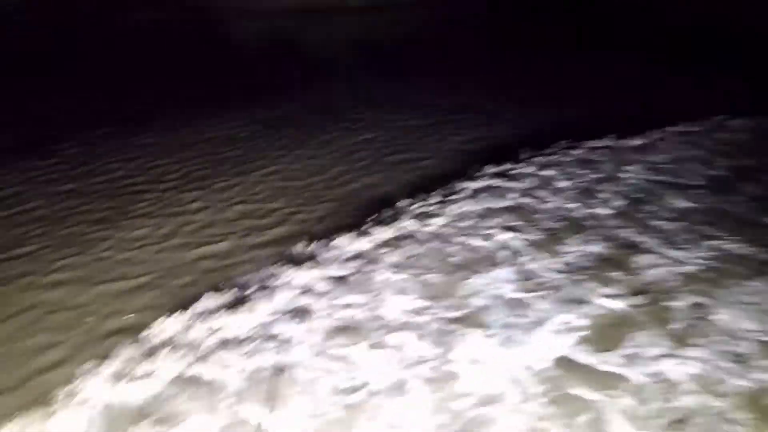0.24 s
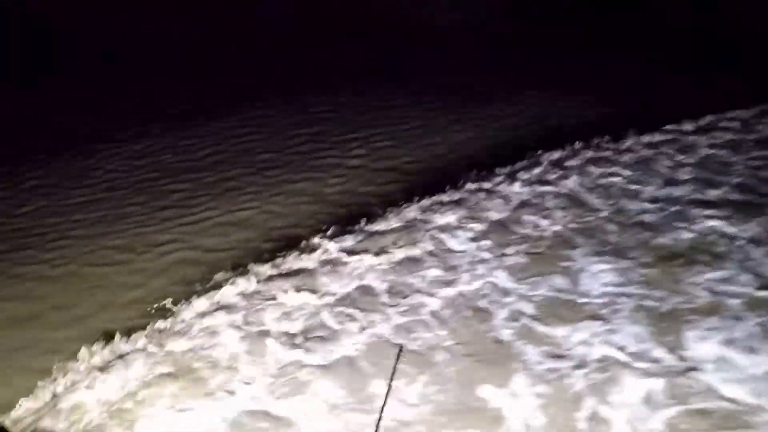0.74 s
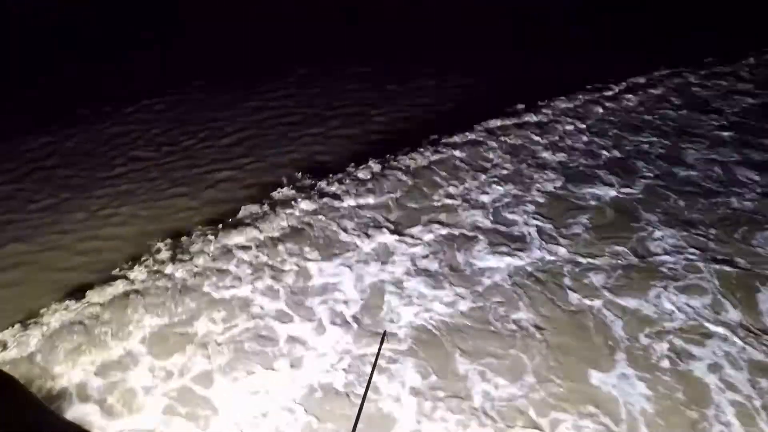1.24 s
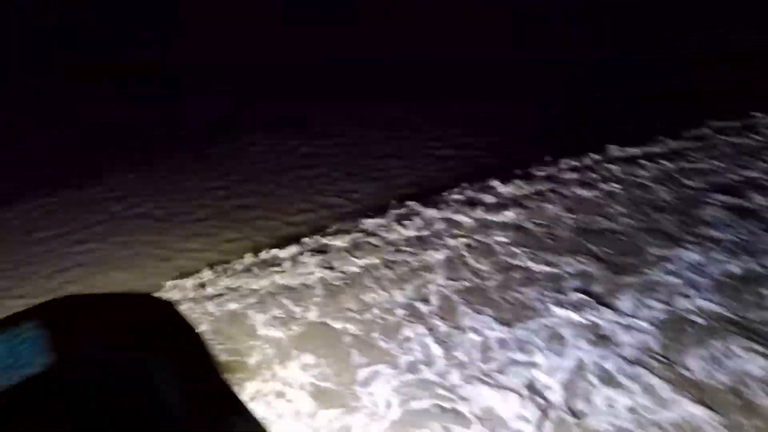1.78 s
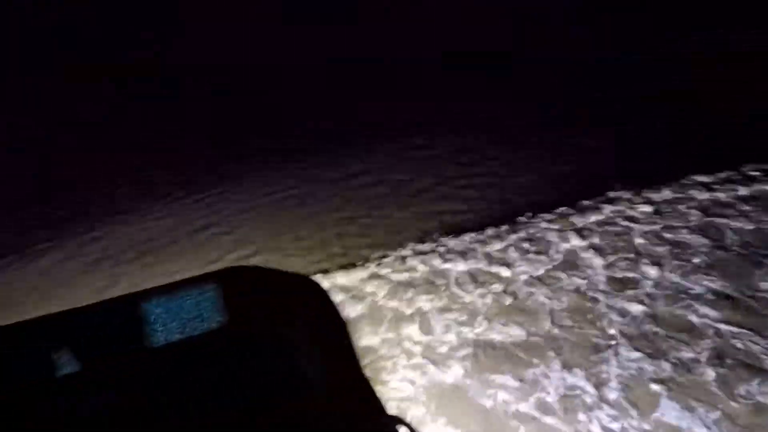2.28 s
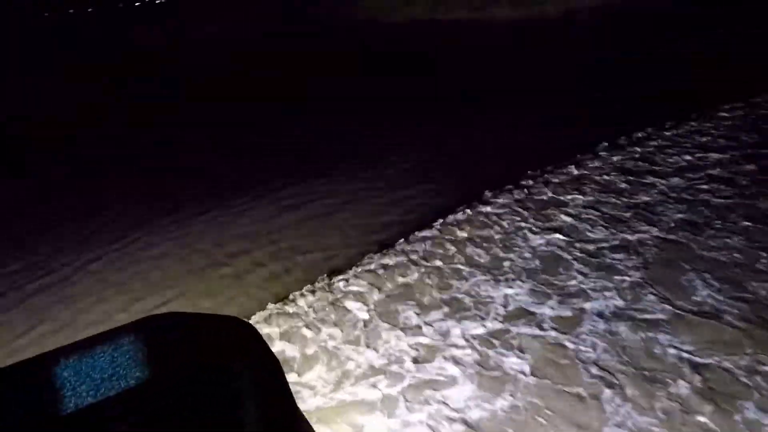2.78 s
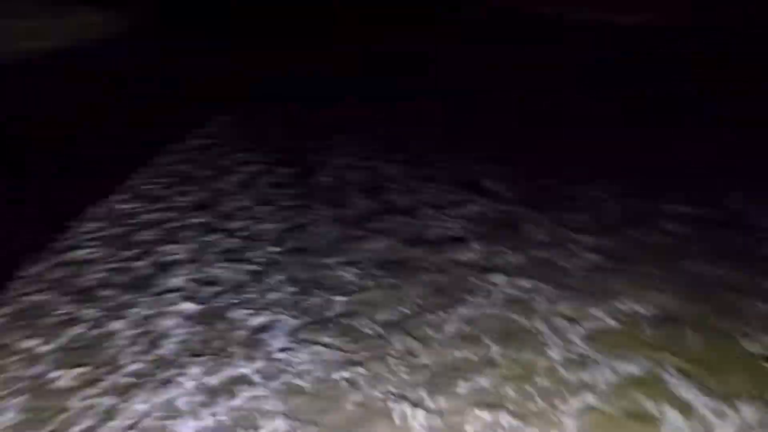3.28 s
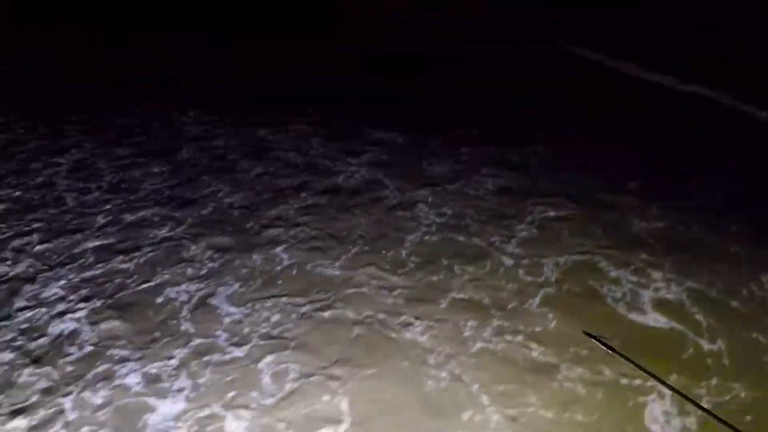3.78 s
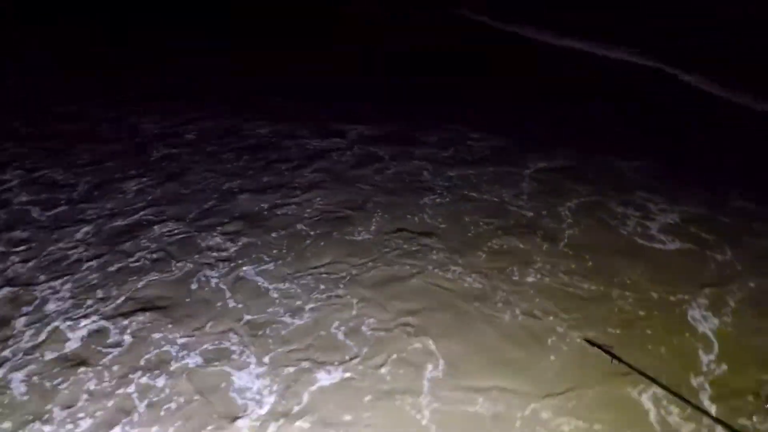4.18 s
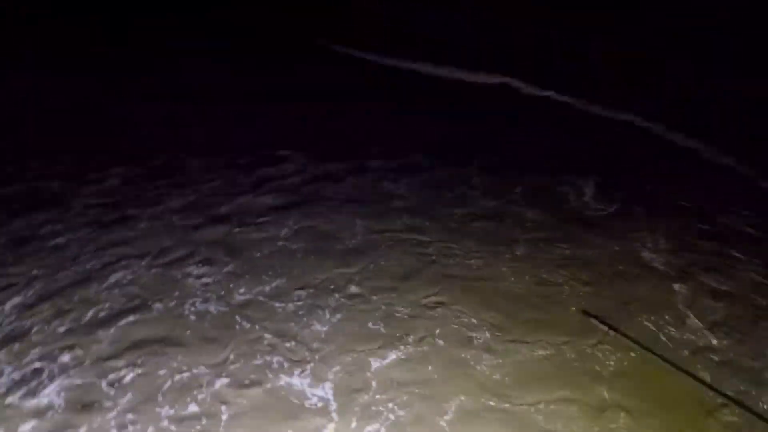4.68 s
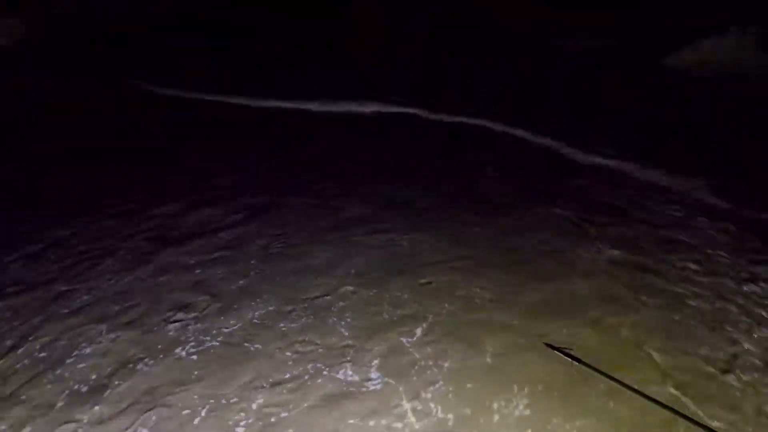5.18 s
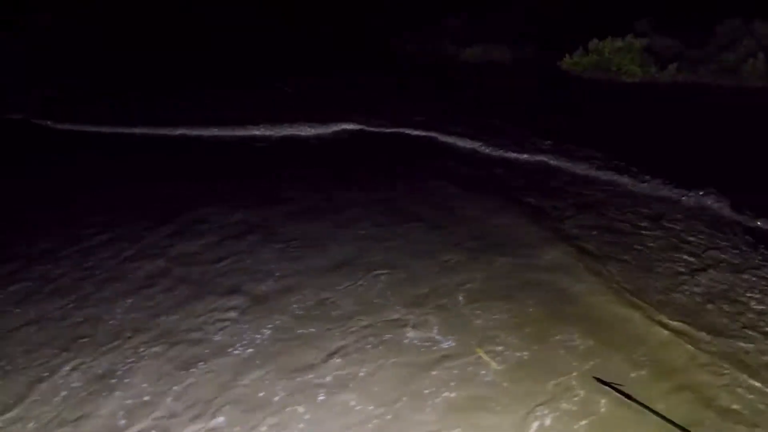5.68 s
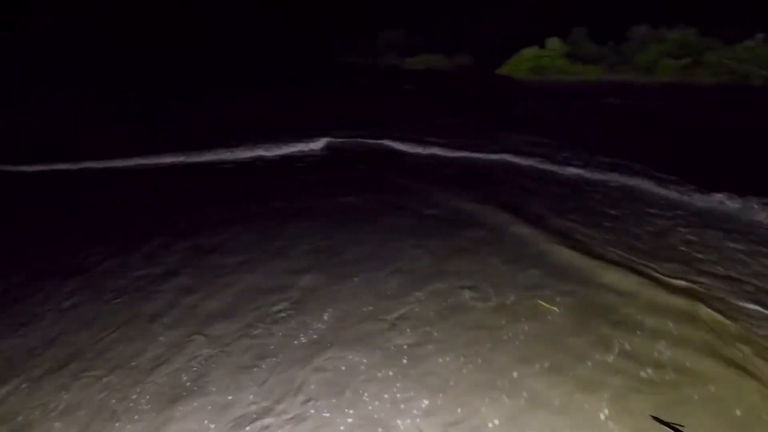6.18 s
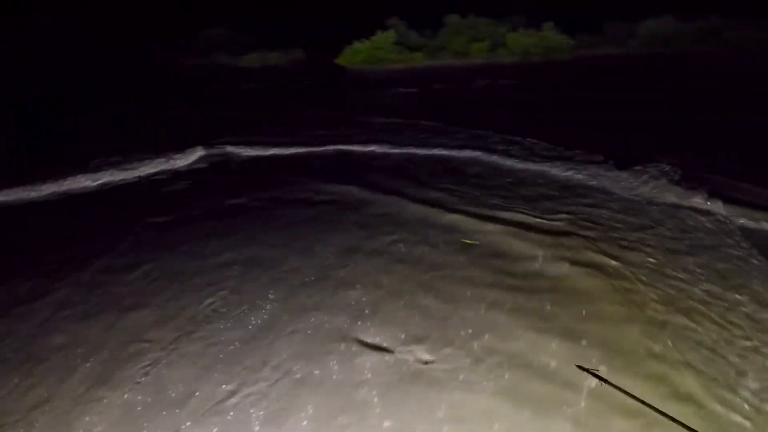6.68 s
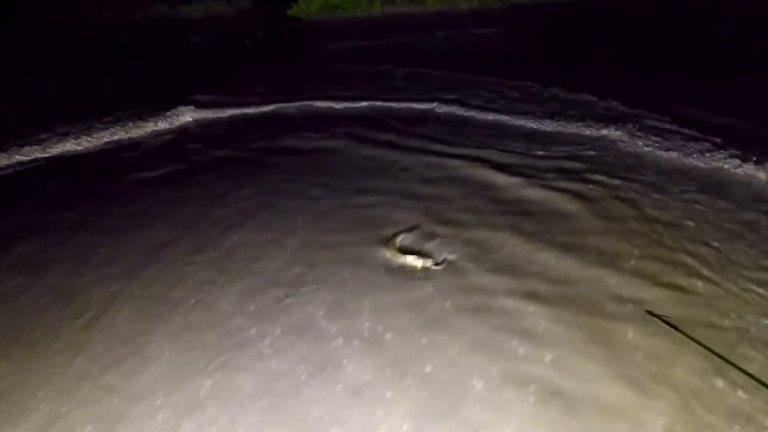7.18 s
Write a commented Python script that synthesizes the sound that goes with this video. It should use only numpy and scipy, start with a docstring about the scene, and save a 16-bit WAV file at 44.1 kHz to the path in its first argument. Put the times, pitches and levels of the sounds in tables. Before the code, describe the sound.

An airboat is heard from on board, its big engine and air propeller making a loud, throbbing drone whose tones beat against each other. At the start a low gust of wind rumbles on the microphone, settling within about a second into lighter, steady wind. The engine is already accelerating, climbing quickly in pitch through the first 1.5 seconds, with a rough growl near the end of that climb. Between about 0.5 and 2 seconds the sound widens from mono to stereo, leaning a little to the right. The pitch peaks at around 3 seconds, then sinks gradually as the throttle eases, almost levelling out by 7 seconds, still running strongly. A broad rush of propeller air continues throughout, fullest at about 1 second. Above it, spray from the hull hisses steadily with a faint foamy sizzle until the end, at about 7.5 seconds.

```python
"""Airboat planing over shallows.

A big eight-cylinder engine speeds up, then eases off, turning an air propeller through a reduction drive.
Blade passes and uneven exhaust beats give two families of tones that beat against each other, over prop
wash, spray and wind. One microphone port is heard first, then a left-right pair fades in."""
import sys
import numpy as np
from scipy import signal
from scipy.fft import rfft, irfft, next_fast_len
from scipy.io import wavfile
from scipy.ndimage import uniform_filter1d

SR = 44100
rng = np.random.default_rng(int(sys.argv[2]) if len(sys.argv) > 2 else 0)


def wav_out(sig):
    """Save sig, one row per channel (or a flat mono array), as 16-bit PCM at SR to the path in sys.argv[1]."""
    wavfile.write(sys.argv[1], SR, np.round(np.clip(np.atleast_2d(sig).T, -1, 1) * 32767).astype(np.int16))


N = 328104

# engine speed: (time [s], four-stroke cycle rate [Hz])
ENGINE_SPEED = [(0.0, 24.03), (0.3, 25.6), (0.6, 27.33), (0.9, 29.74), (1.2, 31.44), (1.55, 32.83),
                (1.9, 33.58), (2.25, 34.39), (2.6, 34.83), (2.95, 35.07), (3.3, 34.92), (3.6, 34.38),
                (3.9, 33.52), (4.2, 33.2), (4.5, 32.63), (4.8, 31.98), (5.1, 31.53), (5.4, 31.1),
                (5.7, 30.51), (6.0, 29.82), (6.35, 29.27), (6.7, 29.01), (7.05, 28.89), (7.44, 28.8)]
# propeller tones: (multiple of blade rate, base level [dB], speed tilt [dB/Hz], hard-pull gain [dB])
BLADE_ORDERS = [(1, -14.5, .5, -2.5), (2, -18.5, 0.66, -11.5), (3, -24.5, 0.08, -5.5),
                (4, -27.5, 0.93, 5.5), (5, -28.5, -0.4, 4.5), (6, -21.5, 0.03, -40), (7, -32.5, 0.2, -8),
                (8, -34.5, -0.5, 0), (9, -36, -1.4, -5), (10, -44, 2.5, 11), (11, -45, -2, -6),
                (12, -47, -1, -8), (13, -48, 3, -2)]
# exhaust tones: (multiple of cycle rate, base level [dB], speed tilt [dB/Hz], hard-pull gain [dB])
EXHAUST_ORDERS = [(1, -41, 2, -2), (2, -31.5, -1, 2), (3, -25, 0.53, 4), (4, -39.5, 1, 5),
                  (5, -20.5, -1.15, 3.5), (6, -35, 0, -5.5), (7, -34.5, 4.5, 13.5), (8, -27, 3, 3),
                  (9, -25.5, 0.5, 1), (10, -24.5, 0.5, -0.5), (11, -33.5, -2, 8.5), (12, -30.5, -1.07, 3),
                  (13, -34.5, -2, -9), (14, -37.5, 1.5, -9), (15, -23.5, 2.5, -8), (16, -31, 0.6, 14),
                  (17, -34.5, 1, -5), (18, -28.5, 1, 4), (19, -26.5, -2, -10), (20, -30.5, -3, -4),
                  (21, -38, 0, 4), (22, -34.5, -0.5, -21), (23, -28, 2.5, 5.5), (24, -35, 0, -15),
                  (25, -35, -1, -5), (26, -27.5, 0.3, -3), (27, -25, 0.8, -10), (28, -27, -1.6, -11.5),
                  (29, -41, -2, -16), (30, -38, -1.5, -11), (31, -28, -1.5, 5), (32, -41, 2.6, -7),
                  (33, -36, -3.5, -3)]
# exhaust pipe response: (frequency [Hz], gain [dB], lag [turns])
PIPE_RESPONSE = [(97, -1, 0), (138.5, 0.5, 0.021), (162, 5.5, 0.0032), (207, 8.5, 0.032), (221.2, 6.5, 0.2),
                 (250.8, -9, 0.11), (292, -4.5, 0.076), (366, -1, 0), (387, 7.5, 0.012), (399, 8.5, 0),
                 (419, 3.5, 0.0073), (448, -15.5, 0.046), (482, -7.5, 0.014), (562, -15.5, 0.12),
                 (610, -6, 0), (699, 4.5, 0.15), (775, -20.5, 0.071), (1020, -9, 0.042)]
# tone gains: (time [s], blade tone [dB], exhaust tone [dB], growl [dB], overtone [dB], whine [dB],
# upper whine [dB])
TONE_SWELLS = [(0, -3, -1.5, -0.5, 4, -4, 0), (.6, 1, 1, -1, 2.5, 0, -1), (.9, 4.5, 0, -6, 3, 0, -2),
               (1.2, 3.5, 0.5, 2.5, 3.5, 3, -5), (1.5, 1, 0.5, 8, 2, -7, -8),
               (1.8, -2, -2.5, 4.5, -4.5, -2, -9), (2.1, 0.5, -2, -0.5, 2, -3, -6),
               (2.4, 1.5, -1, -4.5, -1.5, 6.5, 0), (2.7, 1, -1, -3, -2, -3, -2),
               (3, 1, -1, 0.5, -7, 0.5, -3), (3.3, 0.5, 0, -4.5, -3, -3, -1), (3.6, 0, 0, -6, -4, 0.5, -5),
               (3.9, -1.5, -2.5, -1.5, -8, 0, -14), (4.2, -0.5, 0.5, -0.5, -7, -1, -9),
               (4.5, -1.5, 2, -4.5, -2, 0, -12), (4.8, -1.5, 1, -0.5, -7, -1, -8),
               (5.05, 1, -1.5, -0.5, -4, -1.5, -8), (5.3, 0, 0.5, 1, -1, -3.5, -4),
               (5.6, 0, 0.5, -2, -13, -2.5, 0), (5.9, -0.5, 2.5, -5.5, -2, 2, -5),
               (6.2, -0.5, 3, 0.5, 7, -0.5, -6), (6.5, -0.5, 1, 2.5, 1, 1, -3), (6.9, 0.5, 0, 0, 4, 1, -3),
               (7.15, 1, 0.5, 2, -5, 0, -3), (7.44, 2, 0, -0.5, -5, 4.5, -17)]
# sum tones: (offset above blade rate [cycle rates], level [dB])
SUM_ORDERS = [(1, -36), (2, -40), (3, -39), (10, -41), (16, -44)]
# prop wash, fullest as the hull climbs onto the plane: (time [s], gain [dB], middle [dB], upper [dB])
WASH_GAINS = [(0, -19, 0, 0), (.4, -19.5, 1.5, 0.5), (.8, -16.5, 2, 1.5), (1.05, -15.5, -2.5, 2),
              (1.4, -18, 0.5, 4), (2, -20.5, -2.5, 2), (2.4, -19.5, -2, 2), (2.8, -18.5, -2.5, 2),
              (3.3, -19.5, 0, 1), (3.8, -19, 1, 0.5), (5, -18, -0.5, -1), (6.2, -20, 2, -0.5),
              (7.44, -20, 2, -0.5)]
# water thrown up by the hull: (time [s], spray level [dB], sizzle level [dB])
WATER_LEVELS = [(0, -33.5, -40.5), (.4, -35.5, -43.5), (.75, -33.5, -38.5), (1.4, -32.5, -36.5),
                (1.95, -37, -45), (2.65, -34, -41.5), (3.2, -33.5, -42.5), (3.5, -33, -48),
                (7.44, -33.5, -44.5)]
# noise spectra: (frequency [Hz], relative density [dB])
WASH_SPECTRUM = [(60, -1), (110, -17), (190, -4), (270, -1.5), (400, -6.5), (600, -1.5), (900, -7.5),
                 (1300, -13.5), (1700, -15.5), (2200, -21), (3000, -27), (5000, -39.5)]
SPRAY_SPECTRUM = [(2500, -26), (3300, -6.5), (4200, -3.5), (4900, -3.5), (5400, 0.5), (6000, 4), (6500, 2),
                  (7000, -1), (7800, -4.5), (9000, -11), (10500, -35)]
SIZZLE_SPECTRUM = [(7500, 3.5), (9000, 0), (10500, -8), (12500, -9.5), (14500, -14)]
WIND_SPECTRUM = [(20, 2.5), (35, 20), (60, 15), (80, 12), (110, 6), (200, -10)]
# left port against right: (frequency [Hz], gain [dB], lead [rad], likeness [0-1])
LEFT_RESPONSE = [(90, -3, 0, 1), (200, -4.6, .2, 1), (400, -6.6, 1.4, .93), (700, -15, 3.5, .92),
                 (1000, -13, 2.1, .87), (1600, -10.6, 1.5, .85), (2200, -13.5, 1.6, .45),
                 (3300, -10.5, 2, .36), (3800, -11.3, .7, .35), (4800, -3, -2.1, .73),
                 (6200, -5.4, -2.5, .85), (7800, -6.5, -3, .63), (8600, -10, -3, .5),
                 (10200, -2.5, -3.2, .67), (12500, -7.5, -5, .1), (14000, -13, -5.7, .07)]
# single port against right: (frequency [Hz], gain [dB], lag before limiting [rad], likeness [0-1])
SINGLE_RESPONSE = [(58, 1.5, 2.5, 0.78), (351, 3.5, -1, 0.8), (497, -8.5, -0.05, 0.7), (945, -3.5, 3, 0.74),
                   (1300, -2.5, 3.5, 0.98), (1930, -4, 3, 0.83), (3040, 1, 2, 0.78), (4220, -1.5, 1.5, 0.2),
                   (5000, -8.5, 6, 0.3), (6900, -21.5, 1, 0.9), (9600, -10, 0.5, 0), (11200, -16, -7.5, .2),
                   (12700, 1, -13, .2), (14500, -1, -9, .2)]

CRUISE_HZ, HARD_PULL_HZ_PER_S = 31, 7
BLADES_PER_CYCLE, BLADE_START_TURNS, BLADE_SKEW_TURNS = 3.49, .14, .32
WASH_SPLITS_HZ = 430, 1100
WIND_DB, GUST_DB, GUST_DECAY_S = -30.5, 13, .49
PAIR_START_S, PAIR_FADE_S = .55, .69
PEAK_CEILING, CUTOFF_HZ = .97, 15300
HOP = 40  # samples per control step


def propeller(passes, speed_hz, pull):
    """Each blade pass makes a lopsided pulse: all its tones lead by the same share of their period."""
    blade_db, _, growl_db, overtone_db, whine_db, upper_db = in_time(TONE_SWELLS)
    swell_db = {1: blade_db, 2: growl_db, 4: overtone_db, 6: whine_db, 10: upper_db, 13: upper_db}
    return tones(BLADE_ORDERS, passes, speed_hz, pull, swell_db,
                 spread_rad=np.pi, flutter_db=.8, waver_rad=.07, skew_turns=BLADE_SKEW_TURNS)


def exhaust(cycles, speed_hz, pull):
    """Uneven beats give harmonics of the cycle rate; the pipes lift, cancel and delay them."""
    _, firing_db, growl_db, *_ = in_time(TONE_SWELLS)
    return tones(EXHAUST_ORDERS, cycles, speed_hz, pull, {5: firing_db, 7: growl_db},
                 spread_rad=np.pi / 7, flutter_db=.9, waver_rad=.04, path=PIPE_RESPONSE)


def sum_tones(passes, cycles):
    """Exhaust beats jostle the blade tone and add tones above it."""
    out = 0
    for k, level_db in SUM_ORDERS:
        peak = np.sqrt(2) * amp(level_db + 2 * drift(1.5))
        out = out + peak * np.cos(2 * np.pi * (passes + k * cycles) + drift(1.3))
    return out


def prop_wash():
    """The propeller's turbulent air stream, in three bands."""
    gain_db, middle_db, upper_db = in_time(WASH_GAINS)
    stream = banded_noise(WASH_SPECTRUM, flicker_db=.78)
    low, low_mid = [signal.filtfilt(*signal.butter(2, hz, fs=SR), stream) for hz in WASH_SPLITS_HZ]
    return amp(gain_db) * (low + amp(middle_db) * (low_mid - low) + amp(upper_db) * (stream - low_mid))


def hull_spray():
    """Water thrown up by the hull hisses; its foam sizzles."""
    spray_db, sizzle_db = in_time(WATER_LEVELS)
    spray = amp(spray_db) * banded_noise(SPRAY_SPECTRUM, flicker_db=.77)
    sizzle = amp(sizzle_db) * banded_noise(SIZZLE_SPECTRUM, flicker_db=1.2)
    return spray + sizzle


def wind():
    """Low rumble; an opening gust dies away to steady wind."""
    level_db = WIND_DB + GUST_DB * np.exp(-np.arange(N) / SR / GUST_DECAY_S)
    return amp(level_db) * banded_noise(WIND_SPECTRUM, flicker_db=1.5)


def tones(orders, turns, speed_hz, pull, swell_db, spread_rad, flutter_db, waver_rad,
          waver_db=.6, skew_turns=0, path=None):
    """Sines locked to a rotation, wavering and fluttering; spread smears the pulse over the turn."""
    out, speed_hz, pull = 0, speed_hz[::HOP], pull[::HOP]
    for k, base_db, tilt_db_per_hz, pull_db in orders:
        path_db, lag_turns = at_hz(path, k * speed_hz) if path else (0, 0)
        level_db = base_db + tilt_db_per_hz * (speed_hz - CRUISE_HZ) + pull_db * pull + path_db
        level_db += waver_db * coarse_drift(1.75) + flutter_db * coarse_drift(6.8)
        if k in swell_db:
            level_db += swell_db[k][::HOP]
        shift_rad = 2 * np.pi * (skew_turns - lag_turns) - spread_rad * k * k
        shift_rad += waver_rad * np.sqrt(k) * coarse_drift(2.4)
        out = out + np.sqrt(2) * fine(amp(level_db)) * np.cos(2 * np.pi * k * turns + fine(shift_rad))
    return out


def banded_noise(spectrum, flicker_db):
    """Three independent rows of noise that share their band-by-band flicker; rms 1."""
    out, common_drift = 0, drift(6.6)
    low_hz, top_hz = spectrum[0][0], spectrum[-1][0]
    edges_hz = np.geomspace(low_hz, top_hz, num=round(2.2 * np.log2(top_hz / low_hz)) + 1)
    size = next_fast_len(N)
    colour = amp(at_hz(spectrum, np.arange(size // 2 + 1) * SR / size)[0])
    real, imaginary = rng.standard_normal((2, 2, 3, size // 2 + 1))
    coloured = irfft(colour * (real + 1j * imaginary), size)[..., :N]
    for k, band_hz in enumerate(zip(edges_hz, edges_hz[1:])):
        band = signal.sosfilt(signal.butter(2, band_hz, "band", fs=SR, output="sos"), coloured[k % 2])
        out = out + band * amp(flicker_db * (.5 * common_drift + 1.16 * drift(24)))
    return rms_one(out)


def coarse_drift(rate_hz):
    """Smooth random curve, rms 1, one value a control step."""
    pole = np.exp(-2 * np.pi * rate_hz * HOP / SR)
    noise = rng.standard_normal(N // HOP + 2001)
    return rms_one(signal.lfilter([1], [1, -2 * pole, pole * pole], noise)[2000:])


def drift(rate_hz):
    """Smooth random curve, one value a sample."""
    return fine(coarse_drift(rate_hz))


def fine(coarse):
    """Control steps to samples."""
    return np.interp(np.arange(N) / HOP, np.arange(len(coarse)), coarse)


def in_time(rows):
    """Columns of a time table, one value a sample."""
    time_s, *columns = np.transpose(rows)
    return [np.interp(np.arange(N) / SR, time_s, c) for c in columns]


def at_hz(rows, hz):
    """Columns of a frequency table, interpolated on a log axis."""
    row_hz, *columns = np.transpose(rows)
    return [np.interp(np.log(np.maximum(hz, 1)), np.log(row_hz), c) for c in columns]


def amp(db):
    """dB to gain."""
    return 10 ** (np.asarray(db) / 20)


def rms_one(x):
    """Scale to rms 1."""
    return x / np.sqrt(np.mean(x ** 2) + 1e-20)


def scene():
    """Row 0: sound shared by all ports. Rows 1, 2: turbulence local to the left and the single port."""
    speed_hz = uniform_filter1d(in_time(ENGINE_SPEED)[0], size=6000, mode="nearest")
    rise_hz_per_s = np.maximum(np.gradient(speed_hz) * SR, 0)
    pull = uniform_filter1d(rise_hz_per_s, size=9000, mode="nearest") / HARD_PULL_HZ_PER_S
    cycles = np.cumsum(speed_hz) / SR
    passes = BLADES_PER_CYCLE * cycles + BLADE_START_TURNS
    drone = exhaust(cycles, speed_hz, pull) + propeller(passes, speed_hz, pull)
    drone += sum_tones(passes, cycles)
    # each blade and each exhaust cycle stirs the air stream
    throb = 1 + .06 * np.cos(2 * np.pi * passes) + .079 * np.cos(2 * np.pi * cycles)
    rows = throb * (prop_wash() + hull_spray()) + wind()
    rows[0] += drone
    return rows


def record(dry):
    """One port feeds both channels, then the pair fades in; peaks are rounded, the top is cut."""
    size = next_fast_len(N + SR // 4)
    hz = np.arange(size // 2 + 1) * SR / size
    shared, left_local, single_local = rfft(dry, size)

    def port(gain_db, lead_rad, likeness, local):
        """Shared sound, phase-shifted, mixed with local turbulence and coloured."""
        blend = likeness * np.exp(1j * lead_rad) * shared + np.sqrt(1 - likeness ** 2) * local
        return irfft(amp(gain_db) * blend, size)[:N]

    left = port(*at_hz(LEFT_RESPONSE, hz), left_local)
    single_db, lag_rad, likeness = at_hz(SINGLE_RESPONSE, hz)
    single = port(single_db, -np.clip(lag_rad, -4, 4), likeness, single_local)
    pair_share = 1 - np.exp(-np.maximum(np.arange(N) / SR - PAIR_START_S, 0) / PAIR_FADE_S)
    mixed = (1 - pair_share) * single + pair_share * np.array([left, dry[0]])
    rounded = mixed / (1 + (mixed / PEAK_CEILING) ** 4) ** .25
    return signal.sosfilt(signal.cheby2(16, 70, CUTOFF_HZ, fs=SR, output="sos"), rounded)


dry = scene()
out = record(dry)
wav_out(out)
```